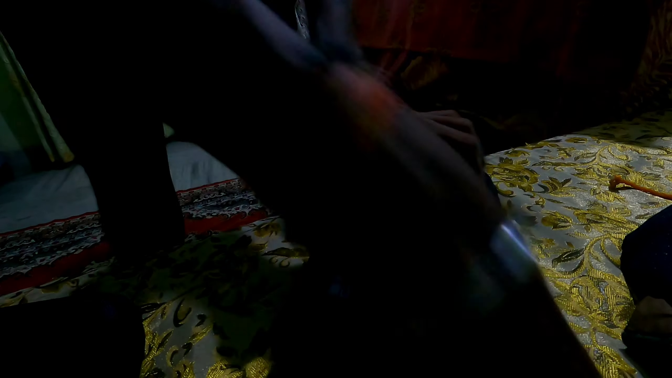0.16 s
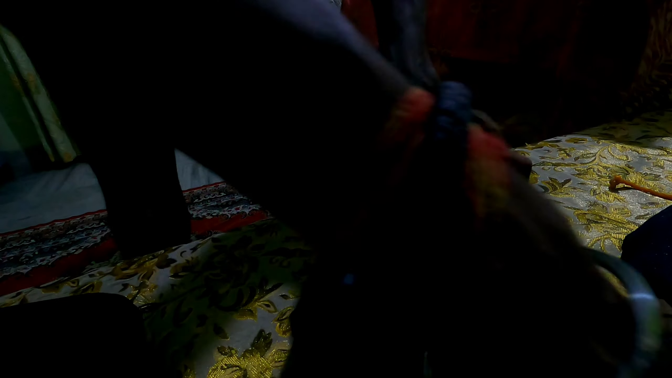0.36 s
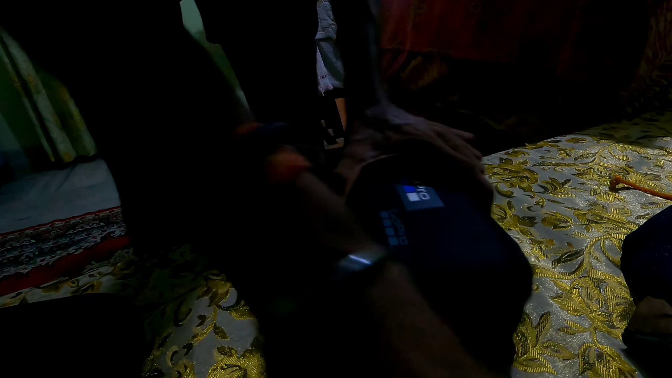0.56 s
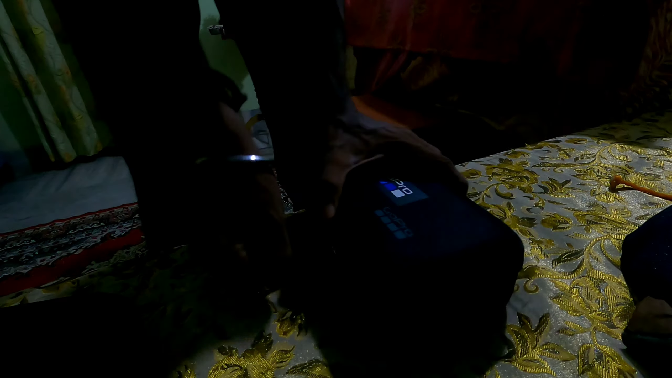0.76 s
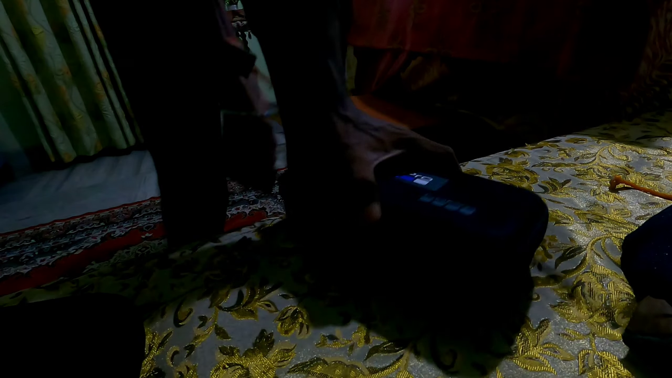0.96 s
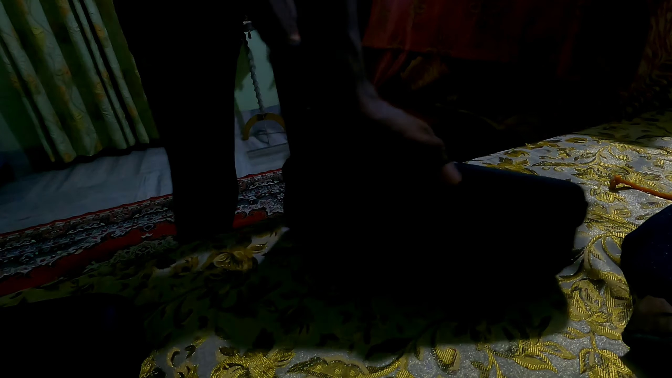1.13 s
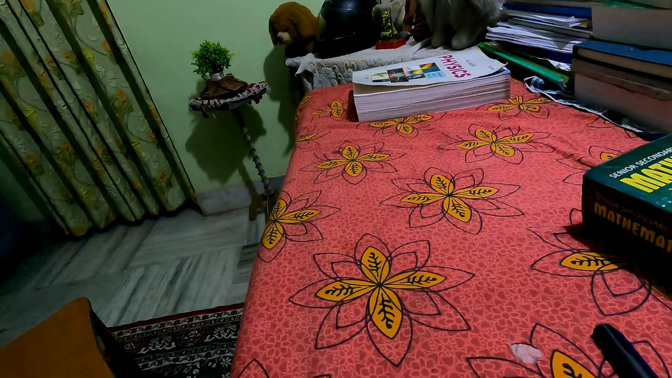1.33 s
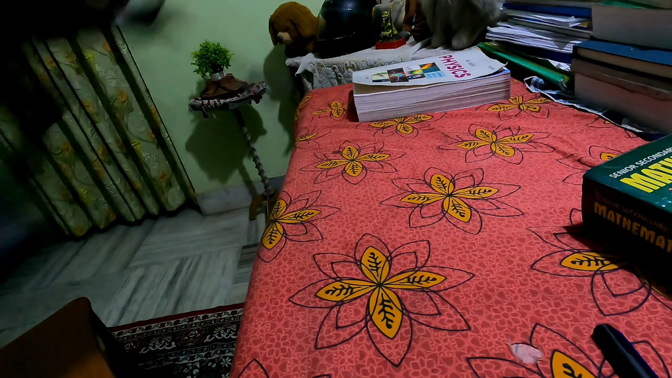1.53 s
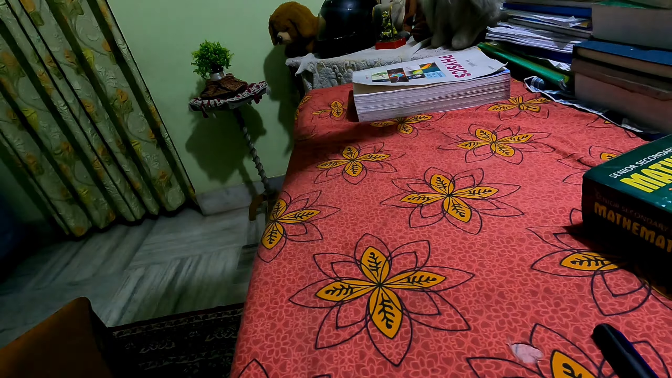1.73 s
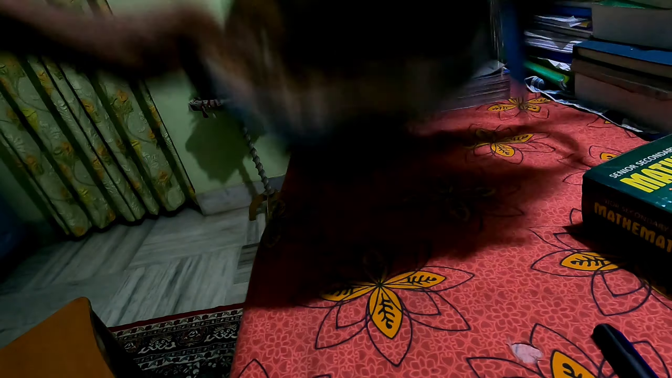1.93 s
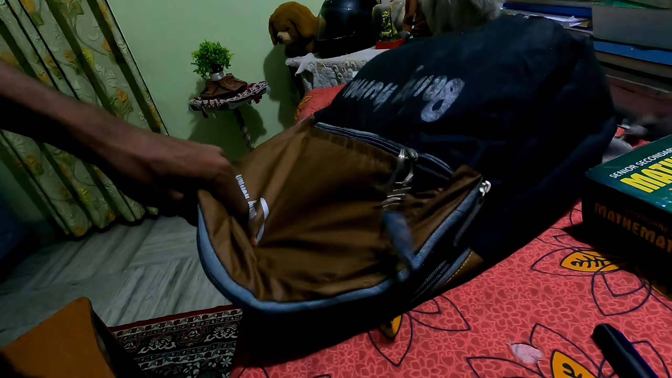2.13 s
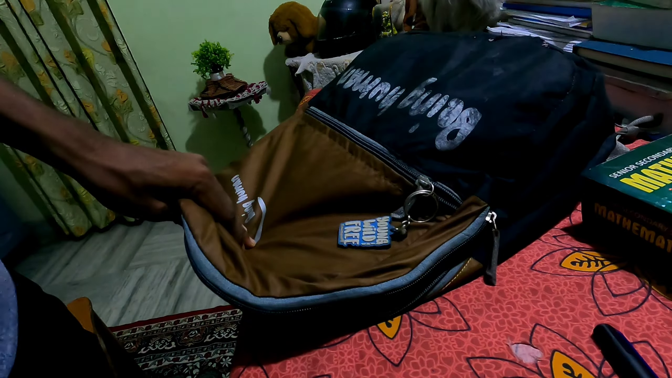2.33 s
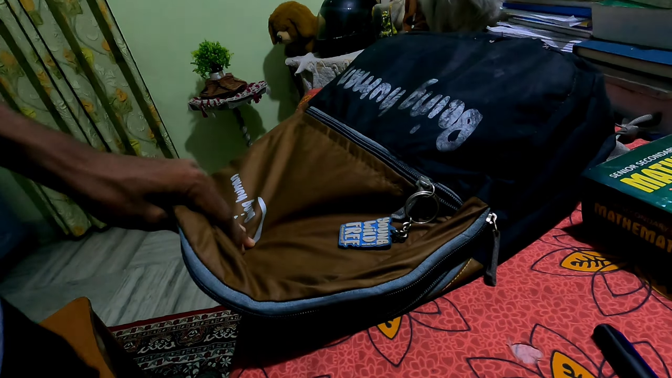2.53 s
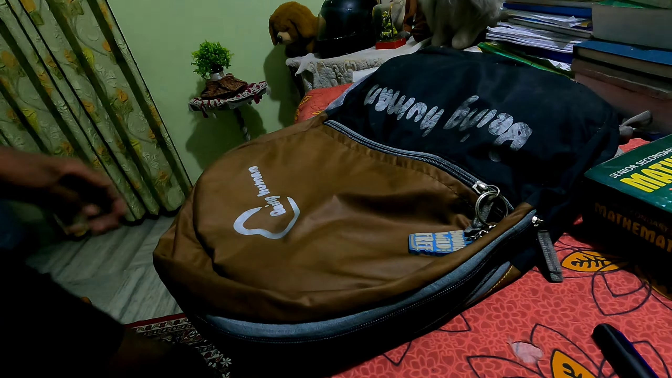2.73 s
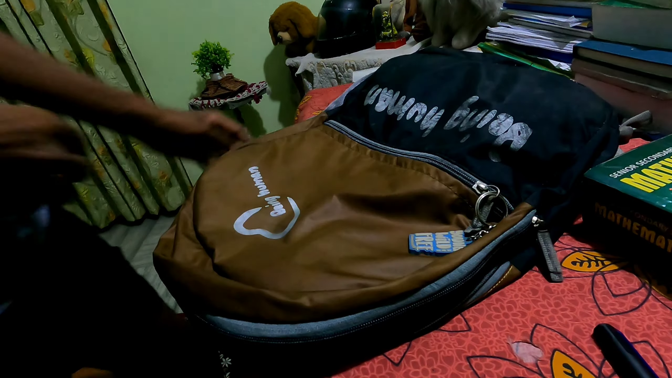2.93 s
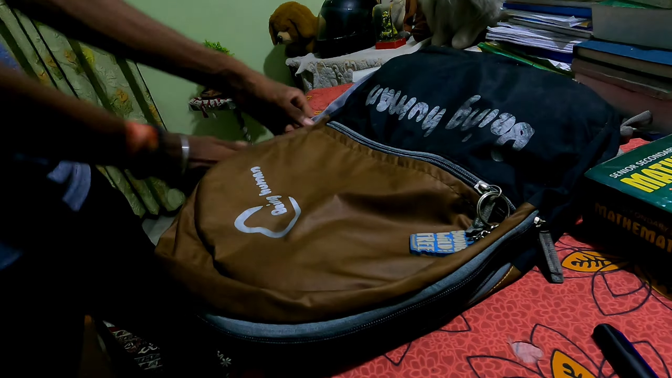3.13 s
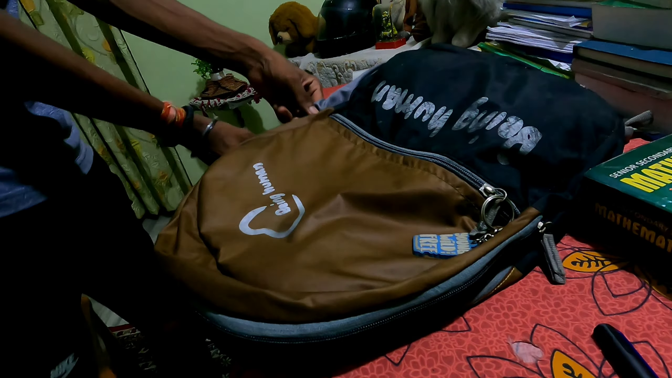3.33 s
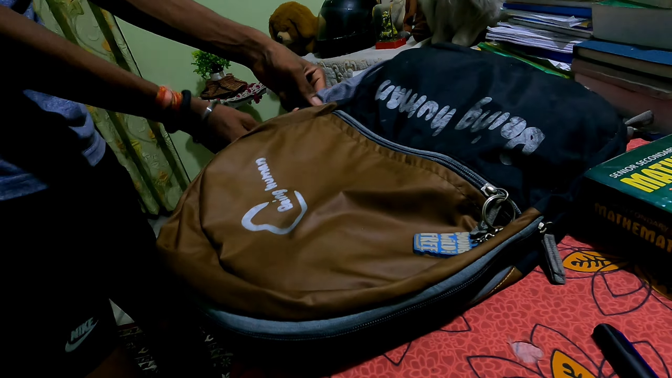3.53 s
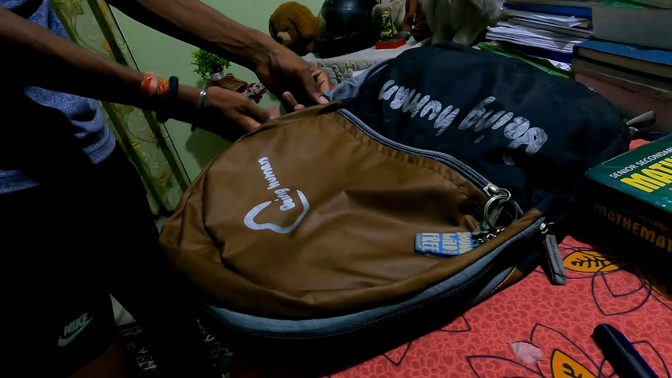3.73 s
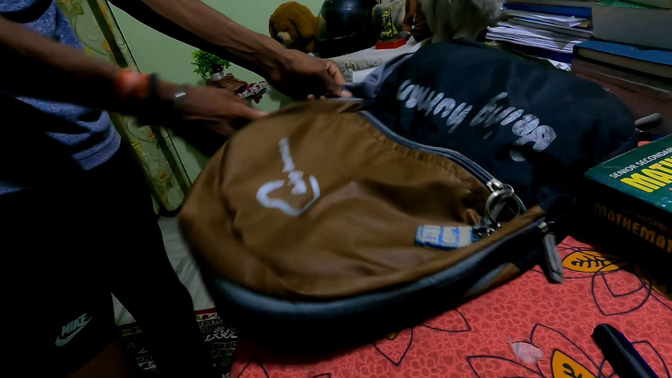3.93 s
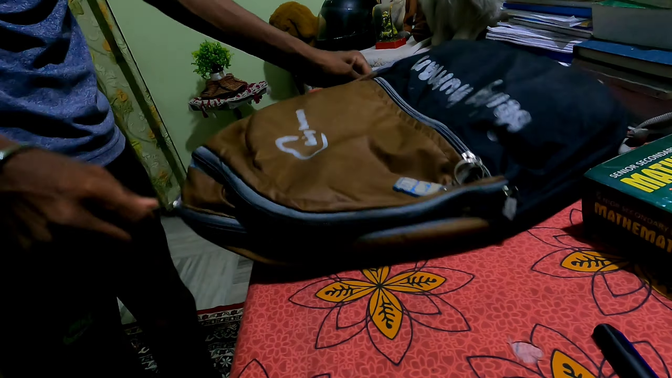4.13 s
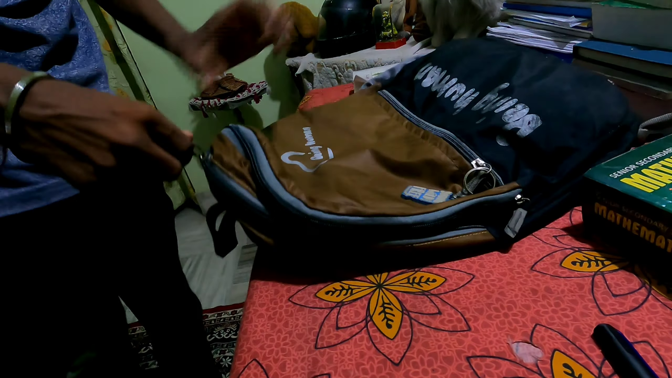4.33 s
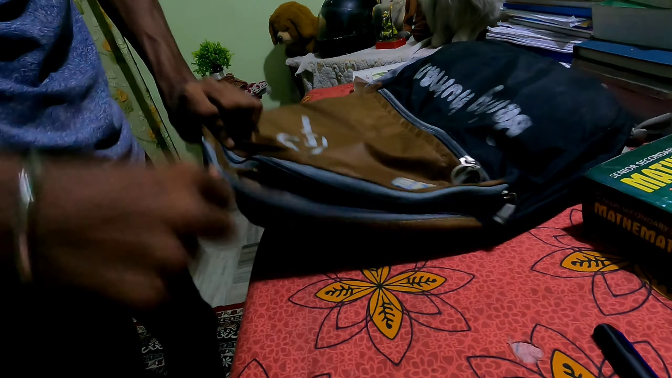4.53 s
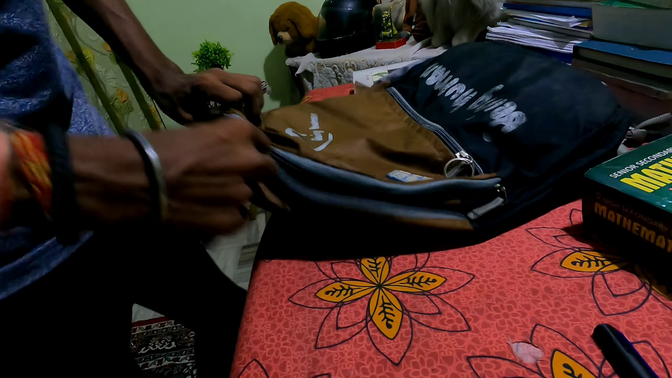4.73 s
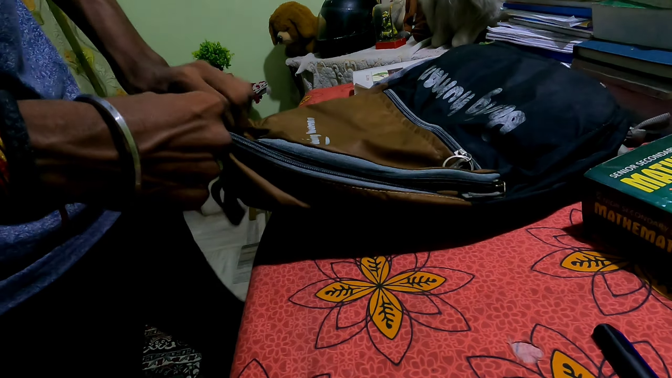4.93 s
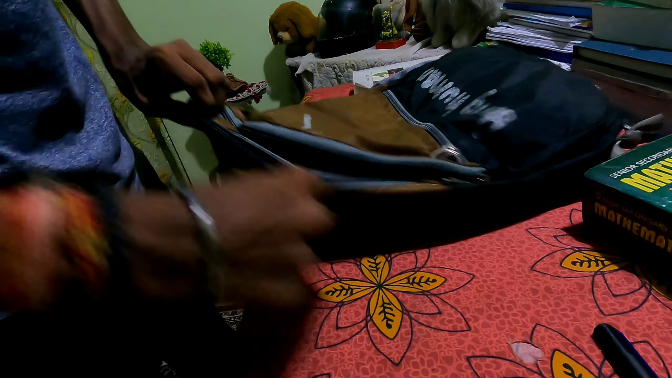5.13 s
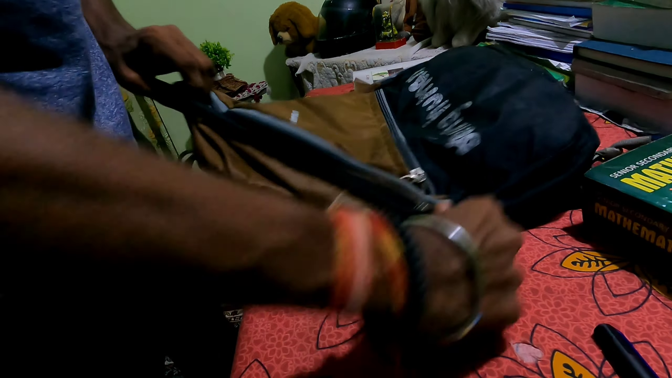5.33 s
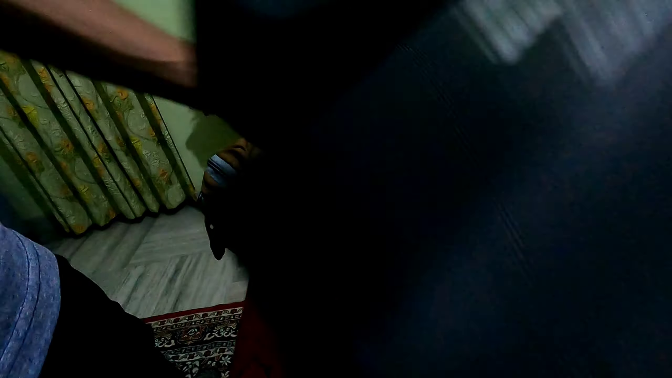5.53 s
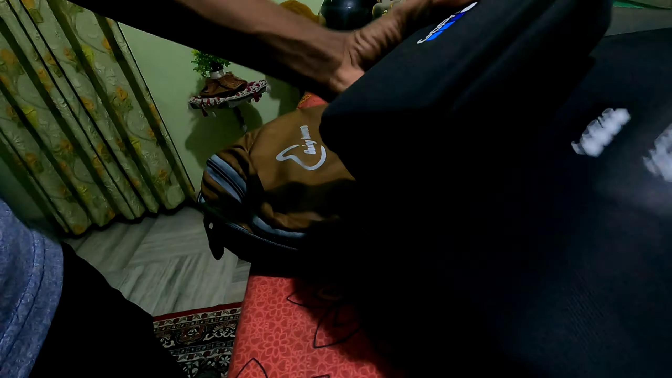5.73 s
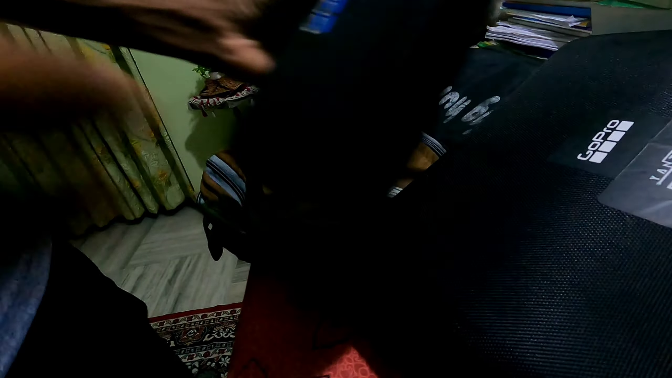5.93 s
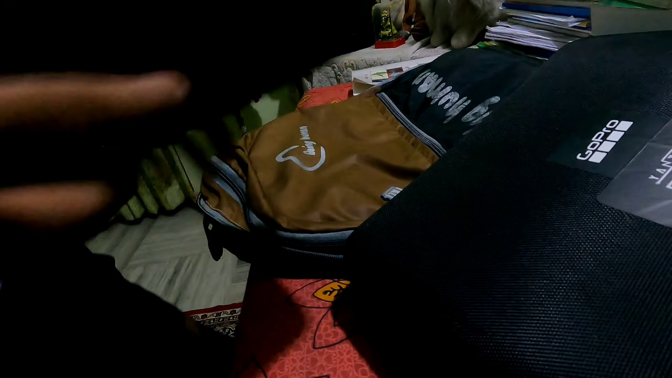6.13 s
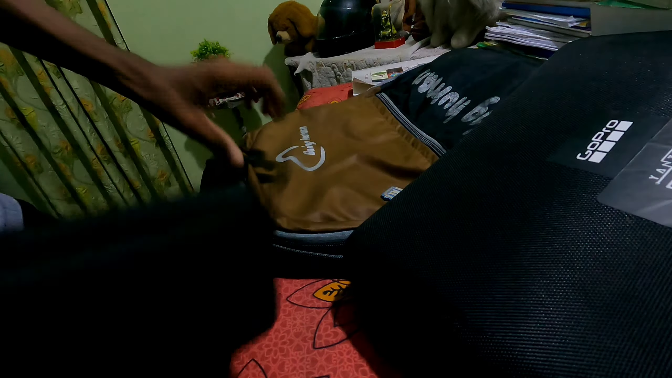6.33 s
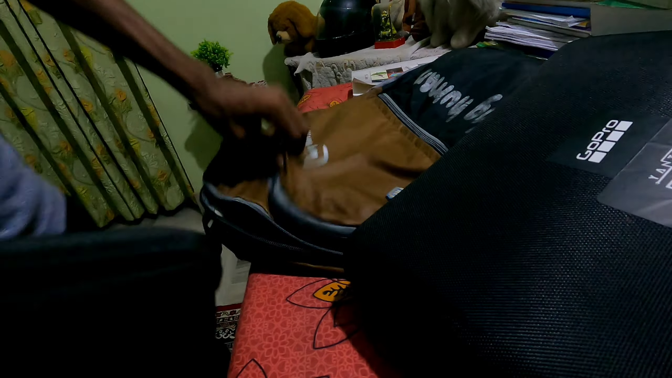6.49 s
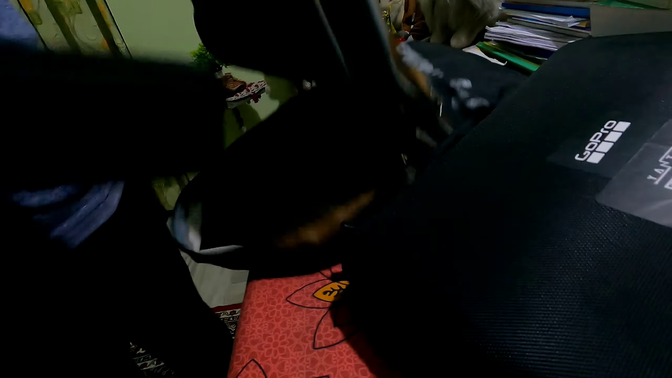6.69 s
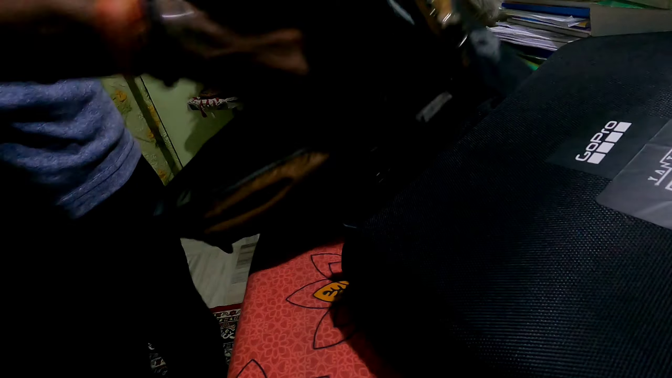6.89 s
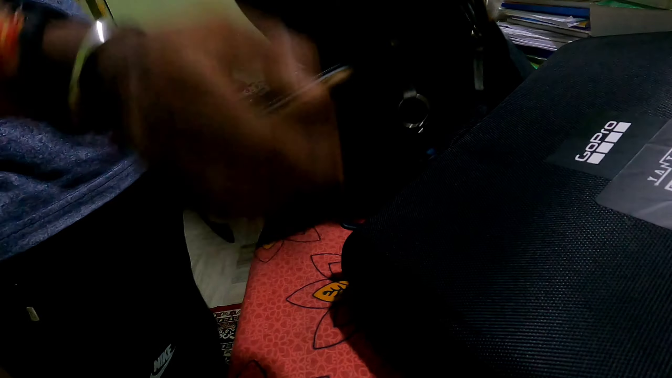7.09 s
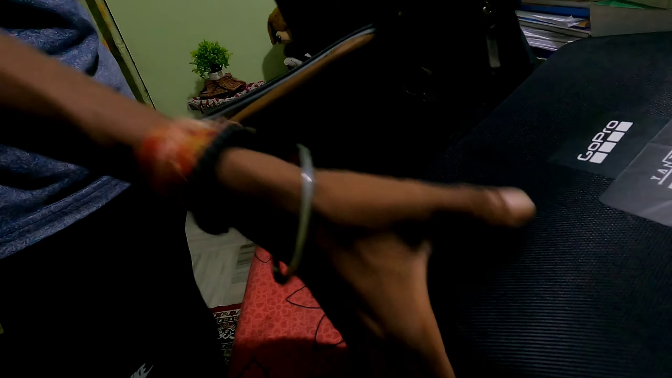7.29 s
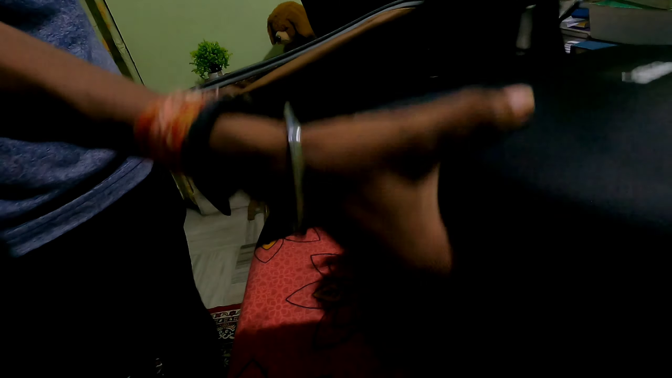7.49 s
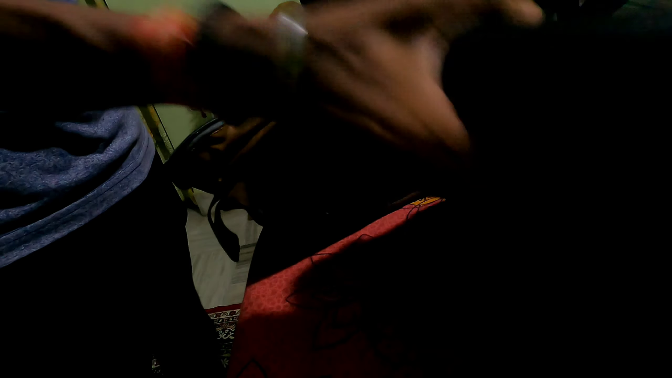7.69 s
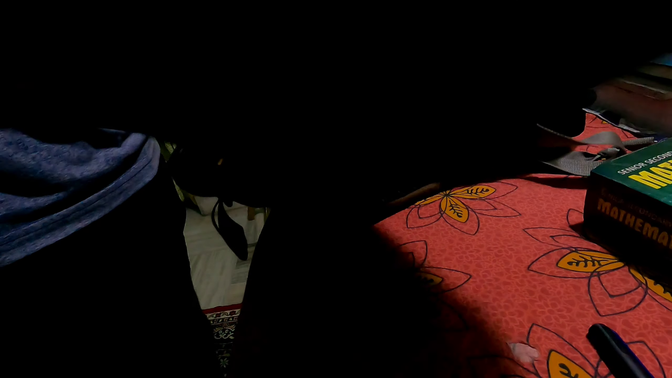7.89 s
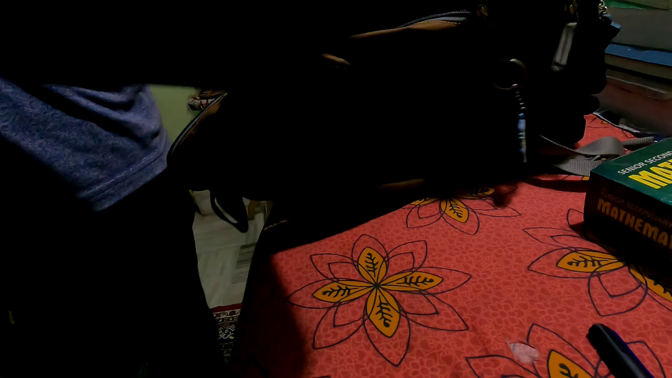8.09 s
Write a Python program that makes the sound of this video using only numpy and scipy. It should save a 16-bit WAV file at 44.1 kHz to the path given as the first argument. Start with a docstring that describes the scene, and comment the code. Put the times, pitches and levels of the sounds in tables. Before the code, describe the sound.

Padded case is bumped and zipped with a hollow rasp, a backpack drops with a thud, zips open, and gear thumps into it indoors.

```python
"""A padded camera case on a bed in a small furnished bedroom is knocked about, zipped shut and later bumped
into a nylon backpack; its gear rings in decaying modes under a soft contact, with a slap of cloth.
Two zips snap and whine tooth by tooth; nylon squeaks and padding scuffs, as ribs passing at the hand's speed.
Short sharp ticks and knocks are damped noise, the mattress thuds as sagging sines, cloth is grains and noise.
Hard parts, zips and scuffs carry a dull room tail; mattress, cloth and a steady hush reach the microphone dry."""
import sys
import numpy as np
from scipy import signal
from scipy.fft import rfft, irfft, next_fast_len
from scipy.io import wavfile

SR = 44100
rng = np.random.default_rng(int(sys.argv[2]) if len(sys.argv) > 2 else 0)


def to_wav(s):
    """Save 16-bit WAV."""
    ch = np.atleast_2d(s).T  # columns
    pcm = np.round(np.clip(ch, -1, 1) * 32767)  # PCM
    wavfile.write(sys.argv[1], SR, pcm.astype(np.int16))


N = 359415
TIME = np.arange(N) / SR


def from_db(db):
    """Decibels to gain."""
    return 10 ** (np.asarray(db) / 20)


def rms_one(x):
    """Scale to unit power."""
    return x / np.sqrt(np.mean(x ** 2) + 1e-20)


def white(size=N):
    """White noise of unit power."""
    return rng.standard_normal(size)


def in_time(rows):
    """Each column of a curve at every sample."""
    s, *columns = np.transpose(rows)
    return [np.interp(TIME, s, column) for column in columns]


def add(track, s, sound):
    """Mix a short sound in at time s."""
    at = int(s * SR)
    track[at:at + len(sound)] += sound[:max(N - at, 0)]


def butter(x, hz, kind="low", order=2):
    """Butterworth filter."""
    sos = signal.butter(order, np.clip(hz, 10, .45 * SR), kind, fs=SR, output="sos")
    return signal.sosfilt(sos, x)


def coloured(x, spectrum):
    """Give a white signal a spectrum, keeping its power."""
    size = next_fast_len(N)
    hz, db = np.transpose(spectrum)
    log_hz = np.log(np.maximum(np.fft.rfftfreq(size, 1 / SR), 1))
    # past either end of the curve the level falls by 20 dB for each factor e in frequency
    beyond = np.abs(log_hz - np.clip(log_hz, np.log(hz[0]), np.log(hz[-1])))
    gain = from_db(np.interp(log_hz, np.log(hz), db) - 20 * beyond)
    return irfft(rfft(x, size) * rms_one(gain), size)[:N]


def drift(per_s):
    """Slow chance with spread 1: straight lines between random knots."""
    knots = white(int(N / SR * per_s) + 2)
    return rms_one(np.interp(TIME * per_s, np.arange(len(knots)), knots))


def grains(per_s, spread_db):
    """Random clicks of uneven size and either sign, unit power."""
    sizes = from_db(spread_db * np.minimum(rng.exponential(1, N), 4))
    signs = rng.choice([-1, 1], N)
    return rms_one(sizes * signs * (rng.random(N) < per_s / SR))


def swell(s, rise_s, fall_s):
    """A bell-shaped movement that rises to 1 at time s and falls away."""
    out = np.zeros(N)
    near = slice(*np.searchsorted(TIME, [s - 4 * rise_s, s + 4 * fall_s]))
    t = TIME[near] - s
    out[near] = np.exp(-(t / np.where(t < 0, rise_s, fall_s)) ** 2)
    return out


def room(x, t60_s=.41, wall_hz=3500, tail_db=-8.5, first_echo_s=.014):
    """A short, dull tail from the walls of a furnished bedroom: decaying noise after a brief gap."""
    t = TIME[:SR // 2]
    tail = butter(butter(white(len(t)), wall_hz, order=1), 140, "high")
    tail *= from_db(-60 * t / t60_s) * (t > first_echo_s)
    tail *= np.sqrt(2 * np.log(1000) / (t60_s * SR))   # makes up for the length of the tail
    return x + from_db(tail_db) * signal.fftconvolve(x, tail)[:N]


# spectrum of the steady background: (frequency [Hz], level [dB])
HUSH_SPECTRUM = [(15, -51.5), (25, -8), (49, -1), (183, 1.5), (312, -4), (455, -12.5), (663, -18),
                 (844, -16.5), (1050, -13.5), (1570, -19.5), (2980, -26.5), (5390, -36.5), (6680, -27.5),
                 (7400, -39.5), (8000, -43), (15400, -73)]


def hush(level_db=-45.5):
    """Steady, mostly low noise behind everything."""
    return from_db(level_db) * coloured(white(), HUSH_SPECTRUM)


# a hand moves over the cloth: (time at its height [s], rise [s], fall [s], crinkle level [dB], rubbing level [dB])
HAND_STROKES = [(.015, 0.034, 0.03, -46.5, -34), (.1, 0.068, 0.17, -57, -42.5),
                (.37, 0.069, 0.083, -49.5, -36.5), (.6, 0.14, 0.19, -49, -33),
                (.755, 0.029, 0.024, -31, -39), (.96, 0.1, 0.18, -41, -32.5),
                (1.19, 0.028, 0.028, -32.5, -34), (1.27, 0.044, 0.39, -57, -46),
                (1.661, 0.084, 0.15, -47.5, -44.5), (2.09, 0.62, 0.068, -50, -45),
                (2.136, 0.015, 0.043, -29.5, -17), (2.239, 0.17, 0.11, -38, -33),
                (2.83, 0.067, 0.14, -54, -71), (3.08, 0.028, 0.034, -50, -37),
                (3.2, 0.025, 0.03, -48.5, -40), (3.295, .035, .025, -46.5, -44),
                (3.3, 0.47, 0.61, -53, -40.5), (3.41, 0.043, 0.07, -48.5, -42),
                (3.65, 0.013, 0.037, -51, -62), (4.21, 0.21, 0.18, -45.5, -39.5),
                (4.582, 0.028, 0.018, -46, -45), (4.68, 0.084, 0.14, -43, -43.5),
                (5.4, 0.7, 0.35, -52, -45), (5.82, 0.014, .03, -68, -44), (5.9, 0.05, 0.062, -61, -31),
                (5.955, 0.042, 0.099, -46.5, -35), (6.24, 0.041, 0.077, -46.5, -35.5),
                (6.6, 0.082, 0.061, -47, -48), (6.781, 0.085, 0.15, -40.5, -35),
                (6.99, 0.044, 0.074, -37, -40.5), (7.083, 0.029, 0.031, -35.5, -24),
                (7.135, 0.025, 0.049, -47.5, -24), (7.39, 0.02, 0.029, -70, -42),
                (7.57, 0.34, 0.41, -49.5, -40.5), (7.839, 0.061, 0.09, -41, -34),
                (8.04, 0.16, 0.35, -49, -41)]
# bag and bedding shift: (time at its height [s], half length [s], level [dB])
BAG_SHIFTS = [(0.08, 0.33, -26.5), (1.105, 0.23, -32.5), (1.81, 0.37, -40), (2.28, 0.13, -26),
              (2.805, 0.059, -29.5), (3.27, 0.2, -38), (4.27, 0.1, -35.5), (5.456, 0.091, -40),
              (5.948, 0.11, -18), (6.374, 0.38, -41), (7.07, 0.25, -29), (7.5, 0.16, -33.5),
              (7.819, 0.059, -26)]


def handling():
    """Levels in dB of crinkling, rubbing and swaying; movements that overlap add in power."""
    hands = 0
    for s, rise_s, fall_s, *levels_db in HAND_STROKES:
        hands = hands + np.outer(from_db(levels_db), swell(s, rise_s, fall_s)) ** 2
    sway = sum((from_db(db) * swell(s, half_s, half_s)) ** 2 for s, half_s, db in BAG_SHIFTS)
    return 10 * np.log10(np.array([*hands, sway]) + 1e-12)


# spectra of buckling folds, of the rubbed surface and of the swaying bag: (frequency [Hz], level [dB])
CRINKLE_SPECTRUM = [(470, -31), (800, -19), (975, -4.5), (1090, -1), (1140, -7.5), (1660, -11.5),
                    (1880, -8.5), (2930, -9.5), (3440, -11), (4040, -12), (7300, -18), (8200, -23.5),
                    (10100, -31.5), (15400, -50.5)]
RUBBING_SPECTRUM = [(76, -56), (130, -1.5), (229, -1.5), (294, 3), (458, -9), (630, -7.5), (726, -11),
                    (779, -12.5), (914, -11), (1560, -18.5), (4130, -36), (9000, -67), (11700, -77),
                    (19800, -120)]
RUMBLE_SPECTRUM = [(12, -64.5), (20, -33), (38, 0), (59, -3), (210, -8.5), (246, -31), (260, -19.5),
                   (340, -43), (570, -120)]


def cloth(crinkle_db=-1, rubbing_db=-1, sway_db=-1):
    """Folds buckle in tiny snaps, the surface catches and slips, the whole bag sways."""
    crinkle, rubbing, sway = handling()
    catching_db = 1.2 * drift(50)
    # pressed hard, cloth lets go in fewer, larger jerks
    pressure = np.clip((rubbing + 45) / 18, 0, .8)
    gliding = np.sqrt(1 - pressure ** 2)
    jerks = pressure * grains(per_s=260, spread_db=2)
    folds = rms_one(grains(per_s=3500, spread_db=3) + white())
    slips = grains(per_s=2500, spread_db=2)
    crinkles = coloured(gliding * folds + jerks, CRINKLE_SPECTRUM)
    rubs = coloured(gliding * slips + jerks, RUBBING_SPECTRUM)
    out = from_db(crinkle + crinkle_db + catching_db) * crinkles
    out += from_db(rubbing + rubbing_db + catching_db) * rubs
    return out + from_db(sway + sway_db) * coloured(white(), RUMBLE_SPECTRUM)


# weight lands on the mattress: (time [s], level [dB], settled pitch [Hz], decay by 60 dB [s])
MATTRESS_THUDS = [(0.05, -11, 84.6, 0.11), (2.127, -4.5, 104.6, 0.41), (2.183, -5.5, 60.3, 0.23),
                  (2.635, -16.5, 45.6, 0.27), (2.818, -15.5, 52.3, 0.099), (3.316, -24, 77.5, 0.13),
                  (4.202, -25.5, 81.5, 0.21), (5.392, -27, 63.2, 0.79), (5.895, -13, 71.6, 0.18),
                  (5.943, -4.5, 111, 0.1), (6.241, -20, 65, 0.23), (6.857, -20.5, 65.4, 0.24),
                  (7.124, -6, 64, 0.18), (7.448, -21.5, 79.6, 0.14), (7.546, -28, 93, 0.35),
                  (7.754, -24, 163, 0.073), (7.82, -17, 146, 0.15)]


def thuds(rise_s=.00039, sag=.17, push_db=-13):
    """The mattress bounces, slowing as it relaxes, and pushes out one slow puff of air."""
    out, t = np.zeros(N), TIME[:SR // 2]
    puff = from_db(push_db) * np.sin(2 * np.pi * 32 * t) * np.exp(-t / .03)
    for s, db, hz, t60 in MATTRESS_THUDS:
        phase = 2 * np.pi * np.cumsum(hz * (1 + sag * np.exp(-t * hz / 2))) / SR
        bounce = from_db(-60 * t / t60) * np.sin(phase) * (1 - np.exp(-t / rise_s))
        add(out, s, from_db(db) * (bounce + puff))
    return out


# short sharp ticks and knocks, from tabs, buckles and the cracks of landings:
# (time [s], relative level [dB], approximate top of the noise band [Hz])
SHARP_TICKS = [(0.667, -19.5, 2060), (1.44, -40, 4660), (2.413, -33.5, 3500), (2.626, -30, 1400),
               (2.816, -30.5, 900), (3.187, -41, 4840), (3.203, -45, 3500), (3.386, -32, 2800),
               (3.638, -38, 3020), (3.754, -42, 3500), (4.022, -36, 2840), (4.031, -28, 2840),
               (4.216, -25, 2480), (4.545, -39, 3250), (4.635, -27.5, 5400), (4.682, -20, 2500),
               (5.201, -32.5, 6500), (5.335, -22.5, 2470), (5.871, -26, 1400), (5.907, -30, 1200),
               (5.957, -31, 1500), (6.027, -34, 1400), (6.391, -27, 1900), (6.414, -24.5, 1900),
               (6.425, -33, 1700), (6.438, -28, 2800), (6.966, -24, 1800), (7.093, -22.5, 2400),
               (7.155, -20, 1500), (7.575, -31.5, 1920), (7.784, -40, 6850), (7.829, -30.5, 6600)]


def ticks(level_db=-3, t60_s=.035):
    """Short sharp ticks and knocks: bands of noise that are damped at once."""
    out, t = np.zeros(N), TIME[:SR // 8]
    for s, db, hz in SHARP_TICKS:
        click = butter(butter(white(len(t)), [hz / 1.8, hz * 1.07], "band"), 11000)
        add(out, s, from_db(db + level_db - 60 * t / t60_s) * rms_one(click))
    return out


def stroke(rows):
    """Speed and loudness of one stroke, silent outside it."""
    speed, db = in_time(rows)
    inside = (TIME > rows[0][0]) & (TIME < rows[-1][0])
    return speed, from_db(db) * inside


def weave(strokes, waver, second_db, third_db):
    """Ribs pass at the speed of the hand: a gliding whistle, hoarse when the grip wavers."""
    out = np.zeros(N)
    wobble = 1 + waver * drift(900)
    grip = from_db(3 * drift(250))
    for rows in strokes:
        speed, gain = stroke(rows)
        on = gain > 0
        phase = 2 * np.pi * np.cumsum((speed * wobble)[on]) / SR
        tone = np.sin(phase)
        tone += from_db(second_db) * np.sin(2 * phase)
        tone += from_db(third_db) * np.sin(3 * phase)
        out[on] += (gain * grip)[on] * tone
    return out


# padding rasps against padding, one list a stroke: (time [s], mean rate [ribs/s], relative level [dB])
SCUFF_STROKES = [
    [(.275, 400, -43), (.298, 454, -18.5), (.318, 220, -58)],
    [(.335, 260, -52), (.368, 340, -23), (.395, 400, -32.5), (.43, 310, -41)],
    [(6.71, 315, -37), (6.745, 630, -26), (6.757, 680, -35), (6.768, 390, -15), (6.783, 550, -18),
     (6.797, 660, -31), (6.828, 520, -27), (6.86, 500, -40)],
]


def scuffs():
    """Padding rasps against padding: a low rib rate with a strong waver."""
    return weave(SCUFF_STROKES, waver=.246, second_db=-18, third_db=-25)


# nylon weave dragged over the case, one list a stroke: (time [s], mean rate [ribs/s], relative level [dB])
SQUEAK_STROKES = [
    [(6.965, 3000, -54), (6.982, 3200, -34), (7.0, 3150, -35), (7.022, 3700, -42), (7.044, 4050, -33),
     (7.06, 4150, -52)],
    [(7.675, 600, -46), (7.688, 690, -28), (7.702, 735, -21.5), (7.716, 700, -48)],
    [(8.085, 4100, -51), (8.108, 3800, -38), (8.125, 3630, -39), (8.145, 3900, -53)],
]


def squeaks():
    """Nylon weave dragged over the case: a purer whistle, its top softened."""
    return butter(weave(SQUEAK_STROKES, waver=.06, second_db=-19, third_db=-17), 5200, order=3)


def zip_teeth(speed, gain, uneven, jitter, scrape, snap=.5, rattle_s=.0007):
    """Each tooth snaps with its own force and timing and chatters briefly, over the scrape of the tape."""
    passed = np.cumsum(speed * (gain > 0)) / SR
    teeth = np.arange(1, int(passed[-1]))
    timing, force = white((2000, 2))[teeth].T
    at = np.interp(teeth + jitter * timing, passed, np.arange(N)).astype(int).clip(0, N - 1)
    snaps = np.zeros(N)
    snaps[at] = np.exp(uneven * force) * np.sqrt(SR / speed[at])   # even power at any tooth rate
    keep = np.exp(-1 / (rattle_s * SR))
    chatter = signal.lfilter([1 - keep], [1, -keep], snaps ** 2 + scrape ** 2)
    return gain * (snap * snaps + np.sqrt(chatter) * white()) / np.hypot(1, snap)


def zip_whine(speed, gain, ring_hz, sharpness, base, flutter_db, wobble, judder, between, count=22):
    """Evenly spaced teeth sing at their rate; the wall lifts the harmonics near its resonance."""
    on = gain > 0
    unsteady = wobble * (1 + judder * (np.gradient(speed) < 0))   # the slider judders as the hand eases off
    phase = 2 * np.pi * np.cumsum((speed * (1 + unsteady * drift(700)))[on]) / SR
    k = np.arange(1, count + 1)[:, None] / 2   # harmonics and the lines halfway between them
    ratio = k * (speed / ring_hz)[on]
    weights = 1 / (1 + (sharpness * (ratio - 1 / ratio)) ** 2) + base * (k == 1)
    weights /= 1 + (k / 5.5) ** 4   # uneven spacing blurs the upper harmonics away
    weights *= np.where(k % 1, between, 1)   # the two rows of teeth are unequal: weaker lines in between
    flutter = np.array([drift(90)[on] for _ in k])
    weights *= from_db(flutter_db * flutter)   # the cloth flexes as it is pulled
    out = np.zeros(N)
    out[on] = (weights * np.sin(k * phase)).sum(axis=0) / np.sqrt((weights ** 2).sum(axis=0) / 2)
    return gain * out


# the backpack is unzipped, one row a pull: (slider starts [s], time at top speed [s], rise [s], fall [s],
# slider stops [s], top speed [teeth/s], relative level [dB])
BACKPACK_PULLS = [(4.04, 4.2, .112, .17, 4.275, 1490, -35), (4.645, 4.682, .04, .035, 4.72, 780, -40),
                  (5.212, 5.297, .075, .19, 5.425, 937, -36.5)]
# what the thin panel lets through of the rasp: (frequency [Hz], level [dB])
BACKPACK_PANEL = [(130, -35), (330, -4), (700, 5), (1100, -2), (1600, 0), (2100, -4), (2900, -1),
                  (4000, -5), (5500, -12), (7200, -15.5), (10000, -27), (15000, -39)]


def bag_slider(start_s, s, rise_s, fall_s, stop_s, top, db):
    """Speed and loudness of one pull: the slider comes free, gathers speed, eases off and is braked."""
    pull = swell(s, rise_s, fall_s)
    freed, braked = (TIME - start_s) / .006, (stop_s - TIME) / .05   # times to free and to brake it, in s
    moving = np.clip(np.minimum(freed, braked), 0, 1)
    bite = np.minimum(pull / .55, 1) ** .8   # no louder beyond 55 % of top speed
    return top * pull, from_db(db) * bite * moving


def bag_zip(rasp_db=-.5, whine_db=1.5, full_rasp_teeth_per_s=950):
    """The thin backpack panel leaves its zip bright; a slow slider snaps the teeth more softly."""
    rasp, whine = np.zeros(N), np.zeros(N)
    for pull in BACKPACK_PULLS:
        speed, gain = bag_slider(*pull)
        softened = gain * np.minimum(speed / full_rasp_teeth_per_s, 1)
        rasp += zip_teeth(speed, softened, uneven=.35, jitter=.03, scrape=.1)
        whine += zip_whine(speed, gain, 2800, sharpness=1.25, base=.6, flutter_db=5,
                           wobble=.013, judder=3, between=.22)
    return from_db(rasp_db) * coloured(rasp, BACKPACK_PANEL) + from_db(whine_db) * whine


# the hand tugs the slider round the case: (time at top speed [s], rise [s], fall [s], top speed [teeth/s],
# relative level [dB], resonance of the shell at the tug [Hz])
SLIDER_TUGS = [(.64, .026, .02, 305, -24, 620), (.70, .025, .02, 265, -30, 500),
               (.762, .03, .018, 640, -31, 800), (.776, .005, .012, 380, -25, 420),
               (.812, .009, .014, 400, -15, 400), (.832, .009, .014, 470, -23, 750),
               (.967, .066, .076, 672, -21.5, 1350), (1.013, .014, .016, 500, -18, 480),
               (1.10, .02, .018, 490, -24, 720), (1.195, .021, .014, 960, -24, 1800),
               (1.245, .02, .035, 280, -29, 340)]
# what the stiff shell lets through of the rasp: (frequency [Hz], level [dB])
CASE_SHELL_SPECTRUM = [(130, -35), (240, 1), (340, 4), (520, 4), (750, -1), (1000, -2), (1300, -4),
                       (2000, -9), (2700, -9), (4000, -18), (7000, -27), (10000, -45), (15000, -56)]


def case_slider(creep_teeth_per_s=250, rest_hz=340):
    """Speed, loudness and shell pitch of the case zip: all three rise with each tug."""
    tugs = np.array([swell(*tug[:3]) for tug in SLIDER_TUGS])
    top, db, tug_hz = np.transpose(SLIDER_TUGS)[3:, :, None]
    # the slider never quite stops between tugs
    speed = creep_teeth_per_s + ((top - creep_teeth_per_s) * tugs).max(axis=0)
    gain = (from_db(db) * tugs ** .35).max(axis=0)
    audible = gain > from_db(-55)
    # the shell rings lowest when the tape is slack
    ring_hz = rest_hz + ((tug_hz - rest_hz) * tugs).sum(axis=0) / np.maximum(tugs.sum(axis=0), 1)
    return speed, gain * audible, ring_hz


def case_zip(rasp_db=-6.5, whine_db=1):
    """The stiff case makes its zip hollow: rasping teeth through the shell, and their whine."""
    speed, gain, ring_hz = case_slider()
    rasp = coloured(zip_teeth(speed, gain, uneven=.5, jitter=.05, scrape=.15), CASE_SHELL_SPECTRUM)
    whine = zip_whine(speed, gain, ring_hz, sharpness=2.1, base=.42, flutter_db=3.5,
                      wobble=.034, judder=.4, between=.1)
    return from_db(rasp_db) * rasp + from_db(whine_db) * whine


# the padded gear lands and rebounds: (time [s], relative strength [dB], contact hardness [Hz],
# relative cloth slap [dB], gap to the first rebound [s], loss per rebound [dB])
GEAR_BUMPS = [(0.03, -8.5, 1830, -17.5, 0.022, 19), (0.037, -2, 777, -32, 0.02, 16),
              (0.069, -12, 900, -38, 0.032, 11.5), (0.199, -23, 900, -38.5, 0.017, 18),
              (.254, -14.5, 930, -37.5, 0.049, 15), (0.514, -17, 706, -32, 0.025, 0.5),
              (.563, -6, 680, -30, 0.031, 29), (0.614, -13, 917, -35, 0.031, 19),
              (.641, -16.5, 900, -27.5, 0.03, 2), (1.218, -14, 456, -42, 0.02, 0.5),
              (2.118, -7, 353, -25, 0.019, 29), (2.134, -5.5, 810, -11.5, 0.027, 1),
              (2.626, -32.5, 1500, -51, 0.033, 13), (2.814, -31.5, 885, -55, .02, 22),
              (5.823, -25, 300, -49, 0.022, -1.5), (5.87, -18.5, 706, -36, 0.046, -1),
              (5.934, -4.5, 560, -27, 0.019, 20), (5.994, -16.5, 645, -38, 0.039, 17),
              (6.2, -20, 300, -34.5, 0.032, 2), (6.234, -3, 288, -14, 0.018, 14),
              (6.256, -4.5, 494, -12.5, 0.051, 13), (6.336, -16, 400, -35, 0.029, 5),
              (6.366, -19, 700, -32.5, .011, 23), (6.391, -7.5, 680, -45, 0.022, 11),
              (6.413, -11, 990, -43, .012, 10), (6.944, -16, 350, -22.5, 0.013, 16),
              (6.965, -16.5, 900, -23.5, 0.028, 14), (6.978, -6, 360, -17, 0.019, 30),
              (7.092, .5, 560, -25, 0.039, 17), (7.12, 2.5, 790, -19.5, 0.016, 8.5),
              (7.169, -16.5, 790, -29, .02, 1.5), (7.751, -15.5, 800, -33, 0.017, 16),
              (7.783, -18.5, 900, -22.5, 0.018, 17), (7.819, -16.5, 453, -23, 0.013, 6),
              (7.967, -30, 1220, -22.5, 0.022, 3)]


def contacts(count=4):
    """Every landing rebounds at shrinking gaps: (s, strength dB, hardness Hz, slap dB)."""
    for s, db, hardness_hz, slap_db, gap_s, loss_db in GEAR_BUMPS:
        for k in range(count):
            yield s, db - k * loss_db, hardness_hz, slap_db - 3 * k * loss_db   # the slap changes 3 times as fast
            s = s + gap_s * .85 ** k


# how the gear rings: (mean frequency [Hz], mean level [dB], decay by 60 dB [s])
RINGING_MODES = [(175, -10.5, 0.07), (240, -4.5, 0.096), (299.8, 5, 0.052), (417.7, 0.5, 0.065),
                 (520.5, 3.5, 0.024), (760, -1, 0.027), (1031, 1.5, 0.018), (1310, -9.5, 0.022)]


def bumps(level_db=1, slap_trim_db=-4.5, slap_t60=.079, slap_hz=1300, slap_top_hz=5600, scatter_db=1, detune=.077):
    """A soft contact favours the low modes of the gear, which shift with the grip; the cloth cover slaps."""
    out, t = np.zeros(N), TIME[:SR // 4]
    hz, mode_db, t60 = np.transpose(RINGING_MODES)[:, :, None]
    squeeze = 1 - np.exp(-(t / .0016) ** 2)   # the padding gives way before the force builds
    for s, db, hardness_hz, slap_db in contacts():
        size, shift = white((2, *hz.shape))
        force = from_db(mode_db + scatter_db * size) / np.hypot(1, (hz / hardness_hz) ** 2)
        modes = force * np.sin(2 * np.pi * hz * (1 + detune * shift) * t) * from_db(-60 * t / t60)
        rings = squeeze * modes.sum(axis=0)
        slap = butter(butter(white(len(t)), [300, slap_hz], "band", order=1), slap_top_hz, order=4)
        add(out, s, from_db(db + level_db) * rings / np.abs(rings).max())
        add(out, s, from_db(slap_db + slap_trim_db) * squeeze * rms_one(slap) * from_db(-60 * t / slap_t60))
    return out


def scene():
    """Everything on the bed: hard parts, zips and rubs in the room, the rest dry over the hush."""
    gear = room(ticks() + scuffs() + squeaks() + bag_zip() + case_zip() + bumps())
    return (hush() + cloth() + thuds() + gear)[None]


# the level dips briefly: (time at the bottom [s], sinking [s], recovery [s], depth [dB])
LEVEL_DIPS = [(1.562, 0.068, 0.024, -13.5), (2.911, 0.0059, 0.033, -35)]


def record(dry, input_gain_db=-5.5, cutoff_hz=15400):
    """The microphone signal is turned down, its level dips briefly twice, and its top is cut steeply."""
    dips_db = sum(db * swell(s, sink_s, recover_s) for s, sink_s, recover_s, db in LEVEL_DIPS)
    top_cut = signal.ellip(10, .1, 80, cutoff_hz, fs=SR, output="sos")
    return signal.sosfilt(top_cut, dry * from_db(input_gain_db + dips_db))


dry = scene()
out = record(dry)
to_wav(out)
```